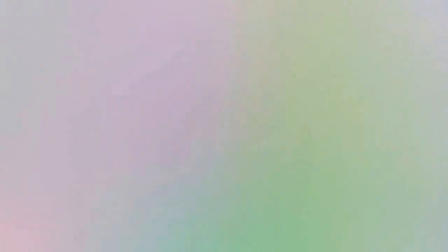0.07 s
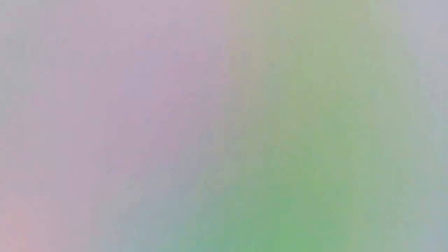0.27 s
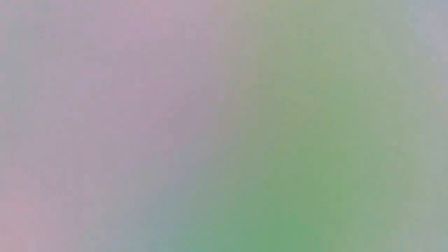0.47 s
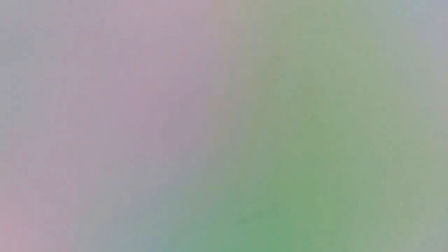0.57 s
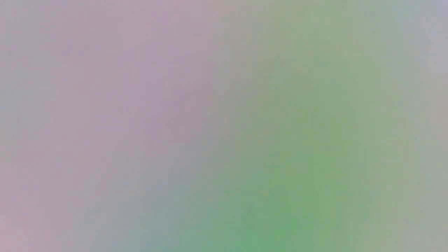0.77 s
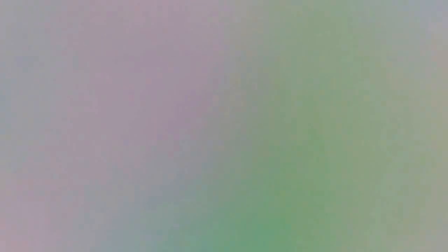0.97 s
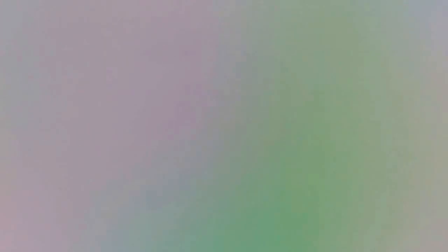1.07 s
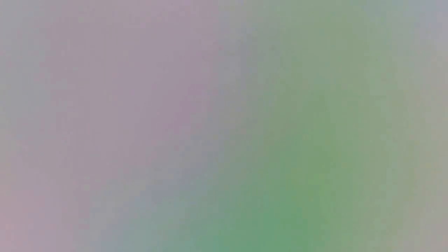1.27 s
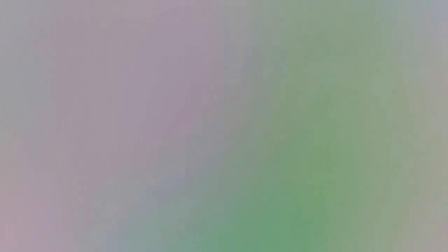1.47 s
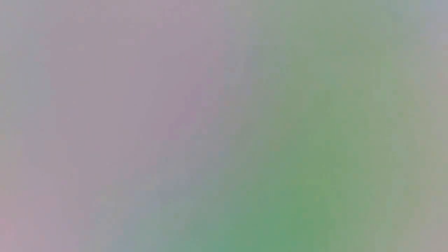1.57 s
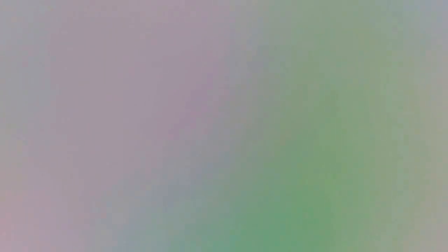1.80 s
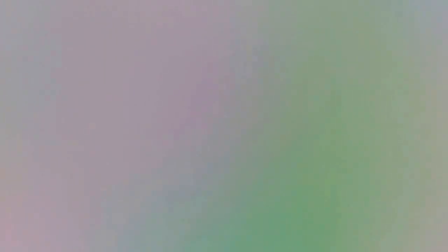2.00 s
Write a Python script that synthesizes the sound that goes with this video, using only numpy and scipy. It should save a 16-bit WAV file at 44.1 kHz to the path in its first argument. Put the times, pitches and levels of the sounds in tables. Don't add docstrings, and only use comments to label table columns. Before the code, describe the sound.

Footsteps crushing snow with hollow pole knocks, a ringing metal tube, tiny squeaks and low thumps

```python
import sys
import numpy as np
from scipy import signal
from scipy.fft import rfft, irfft
from scipy.io import wavfile
from scipy.ndimage import uniform_filter1d

SR = 44100
rng = np.random.default_rng(int(sys.argv[2]) if len(sys.argv) > 2 else 0)


def makeup_ratio(level_db):
    decades = np.asarray(level_db, float) / 20
    return 10 ** decades


def inscribe(sig):
    pcm = np.round(np.clip(np.atleast_2d(sig).T, -1, 1) * 32767)
    wavfile.write(sys.argv[1], SR, pcm.astype(np.int16))


N = 90052


def evened(x):
    return x / np.sqrt(np.mean(x ** 2) + 1e-20)


def curve(points):
    times, levels = np.transpose(points)
    return makeup_ratio(np.interp(np.arange(N) / SR, times, levels))


def colour(x, points):
    f, db = np.transpose(points)
    hz = np.fft.rfftfreq(x.shape[-1], 1 / SR)
    gain = makeup_ratio(np.interp(np.log(hz + 1), np.log(f + 1), db, -90, -90))
    return irfft(rfft(x) * gain, x.shape[-1])


def burst(start, length, db, rise):
    u = (np.arange(N) / SR - start) / length
    swell = np.sin(np.pi / 2 * np.clip(u / rise, 0, 1)) ** 2
    fade_db = -11 * np.clip(u - rise, 0, 9) ** 2
    return makeup_ratio(db + fade_db) * swell


def grains(per_s, spread_db, bed):
    size = makeup_ratio(spread_db * np.minimum(rng.exponential(1, N), 4))
    clicks = size * rng.choice([-1., 1.], N) * (rng.random(N) < per_s / SR)
    return evened(clicks) + bed * rng.standard_normal(N)


def patchy(x, depth_db, gaps=-9.0):
    z = signal.stft(x, nperseg=512)[2]
    field = uniform_filter1d(rng.standard_normal(z.shape), size=25, axis=0)
    field = evened(uniform_filter1d(field, size=7, axis=1))
    patch_db = depth_db * field - 50 * np.clip(gaps - field, 0, .5)
    return signal.istft(z * makeup_ratio(patch_db), nperseg=512)[1][:N]


def rings(rows, rise_cycles):
    out = np.zeros(N)
    for s, db, hz, t60 in rows:
        t = np.maximum(np.arange(N) / SR - s, 0)
        onset = 1 - np.exp(-t * hz / rise_cycles)
        out += makeup_ratio(db - 60 * t / t60) * onset * np.sin(2 * np.pi * hz * t)
    return out


def hiss():
    # f/Hz, level/dB per Hz
    floor_tone = [(100, -55), (170, -16), (447, -21), (539, -17), (1090, -26), (1610, -25.5), (5120, -31),
                  (10800, -20), (14500, -28)]
    # t/s, level/dB
    rustle = [(0, 11), (.65, 9), (.83, 7.5), (.915, 7.5), (.95, 9.5), (1.3, 10.5), (1.55, 10.5),
              (2.04, 11.5)]
    slow = uniform_filter1d(rng.standard_normal(N), size=900)
    flicker = makeup_ratio(evened(uniform_filter1d(slow, size=900)))
    noise = evened(colour(rng.standard_normal((2, N)), floor_tone))
    return makeup_ratio(-79) * curve(rustle) * flicker * noise


def wind():
    # t/s, level/dB
    gust_level = [(0, -46.5), (.12, -56.5), (.33, -71), (.45, -42), (.58, -64), (.78, -64), (.9, -75),
                  (.96, -62), (1.1, -54), (1.5, -52.5), (2.04, -53)]
    # f/Hz, level/dB
    gust_tone = [(25, -20.5), (45, 4.5), (65, 2.5), (120, -6.5), (250, -24), (600, -57.5), (1500, -74)]
    lumps = grains(per_s=290, spread_db=5.0, bed=1.5)
    return curve(gust_level) * evened(colour(lumps, gust_tone))


def crush():
    # start t/s, length/s, dull grain level/dB, fizz level/dB, crispness of dull grains/0-1
    bursts = [(-0.01, 0.029, -55, -45, 0.14), (0.022, 0.051, -52.5, -52.5, 0.04),
              (0.059, 0.16, -73, -59.5, 0.6), (0.118, 0.031, -62.5, -62, 1),
              (0.168, 0.045, -50, -63.5, 0.3), (0.198, 0.071, -51.5, -73, 0.96),
              (0.228, 0.032, -65, -60.5, 1), (0.265, 0.08, -59, -69.5, 0.98),
              (0.296, 0.076, -69, -62.5, 0.7), (0.366, 0.097, -51, -62.5, 0.03),
              (0.402, 0.041, -52, -75, 0.4), (0.484, 0.063, -53.5, -62.5, 0.2),
              (0.568, 0.057, -60, -66.5, 0.61), (0.643, 0.049, -66.5, -67, 0),
              (0.709, 0.043, -73, -65.5, 0.1), (0.76, 0.024, -60.5, -64, 0.2), (0.79, 0.027, -61, -60, 1),
              (0.917, 0.038, -60.5, -58.5, 0.9), (0.931, 0.046, -57, -59, 1),
              (0.979, 0.051, -55.5, -64, 0.65), (1.03, 0.079, -58.5, -68.5, 0.14),
              (1.103, 0.09, -62.5, -64, 0.13), (1.189, 0.15, -62, -69, 0.05),
              (1.294, 0.13, -69, -64.5, 0.47), (1.365, 0.045, -76, -60, 0.9), (1.411, 0.035, -64, -62, 0.2),
              (1.46, 0.19, -77, -70, 1), (1.493, 0.036, -69, -78, 1), (1.588, 0.039, -69, -62.5, 0.9),
              (1.653, 0.083, -68, -69, 0.4), (2.006, 0.086, -61, -70, 0.12)]
    # f/Hz, level/dB per Hz
    dull_tone = [(76, -56), (130, 3.5), (340, 1), (561, -8.5), (726, -8), (1580, -23.5), (4000, -37),
                 (5200, -52), (8800, -120)]
    # f/Hz, level/dB per Hz
    fizz_tone = [(1760, -22.5), (3000, -22.5), (3880, -21), (6300, -12), (7500, -4), (9080, -4.5),
                 (13600, -30.5), (14500, -9.5)]
    rise = 0.36
    dull = evened(patchy(colour(grains(per_s=1400, spread_db=2.0, bed=1.0), dull_tone), depth_db=3.5))
    soft = signal.sosfiltfilt(signal.butter(2, 392, fs=SR, output="sos"), dull)
    fizz = evened(patchy(colour(grains(per_s=2500, spread_db=3.0, bed=0.9), fizz_tone), depth_db=2.0))
    wide = evened(colour(grains(per_s=5900, spread_db=6.0, bed=0.26), fizz_tone))

    soft_power, crisp_power, fizz_power = np.zeros(N), np.zeros(N), np.zeros(N)
    for start, length, dull_db, fizz_db, crisp in bursts:
        power = burst(start, length, dull_db, rise) ** 2
        soft_power += power * (1 - crisp)
        crisp_power += power * crisp
        fizz_power += burst(start, length, fizz_db, rise) ** 2
    thud = np.sqrt(soft_power) * evened(soft)
    crunch = np.sqrt(crisp_power) * evened(dull - soft)
    high = np.sqrt(fizz_power)
    return thud + crunch + high * fizz, high * wide * makeup_ratio(-2.5)


def jolts():
    # t/s, peak level/dB, f/Hz, length/s
    thumps = [(-0.009, -40.5, 61.7, 0.1), (0.029, -48, 75.6, 0.038), (0.324, -57, 88.5, 0.16),
              (0.348, -43.5, 55.5, 0.061), (0.373, -44.5, 117.8, 0.092), (0.408, -34, 58, 0.075),
              (0.433, -32.5, 90, 0.018), (0.47, -45.5, 51.3, 0.096), (0.938, -53, 46, 0.055),
              (1.042, -37.5, 58.4, 0.071), (1.074, -47.5, 88, 0.087), (1.097, -40.5, 48.5, 0.031),
              (1.159, -53, 47.8, 0.36), (1.281, -32, 60.5, 0.045), (1.308, -37.5, 113.5, 0.028),
              (1.346, -41.5, 67.4, 0.043), (1.391, -44, 50.9, 0.15), (1.416, -47, 75.6, 0.054),
              (1.437, -41, 60.7, 0.16), (1.454, -40.5, 98, 0.016), (1.487, -48, 78.1, 0.15),
              (1.532, -35, 92.7, 0.035), (1.577, -51, 50, 0.13), (1.615, -51, 72, 0.037),
              (1.709, -44, 118.2, 0.14), (1.728, -38.5, 81.4, 0.075), (1.768, -51, 60.3, 0.2),
              (1.813, -45.5, 97.6, 0.095), (1.928, -43, 58, 0.079), (1.959, -42.5, 91.5, 0.053),
              (2.018, -47, 119, 0.028)]
    out = np.zeros(N)
    for s, db, hz, length in thumps:
        t = np.clip(np.arange(N) / SR - s, 0, length)
        arch = np.sin(np.pi * (t / length) ** 0.6)
        out += makeup_ratio(db) * arch * np.sin(2 * np.pi * hz * t)
    return out


def grip_knocks():
    # t/s, level/dB, f/Hz, t60/s
    knocks = [
        (0.004, -40, 490, 0.026),
        (0.18, -33, 303, 0.029),
        (0.197, -36.5, 415, 0.085),
        (0.201, -38, 938, 0.1),
        (0.222, -38, 437, 0.082),
        (0.426, -41.5, 276, 0.096),
    ]
    return rings(knocks, rise_cycles=1.0)


def pole():
    # f/Hz, level/dB, t60/s
    modes = [(389.6, -10, 0.11), (592, -19, 0.092), (906, -7.5, 0.094), (1250, -10.5, 0.073),
             (1633, -12, 0.1), (2062, -14.5, 0.086), (2603, -17.5, 0.068), (3566, -26.5, 0.04)]
    # start t/s, length/s, level/dB, tilt/dB per octave
    scrapes = [
        (0.168, 0.071, -49.5, -2.5),
        (0.227, 0.026, -43.5, -1.5),
        (0.267, 0.14, -53, -4),
        (0.306, 0.03, -57.5, 8),
        (0.4, 0.025, -59.5, 5.5),
        (1.358, 0.11, -65.5, 3),
        (1.427, 0.024, -69.5, 11.5),
        (1.598, 0.019, -66.5, 12.5),
    ]
    slips = grains(per_s=2800, spread_db=0.0, bed=0.89)
    out = np.zeros(N)
    for hz, mode_db, t60 in modes:
        r = makeup_ratio(-60 / t60 / SR)
        ring = evened(signal.lfilter([1], [1, -2 * r * np.cos(2 * np.pi * hz / SR), r * r], slips))
        swing = uniform_filter1d(ring ** 2 + 1e-3, size=600)
        ring = evened(ring / swing ** 0.15)
        push = np.zeros(N)
        for start, length, db, tilt in scrapes:
            tilt_db = tilt * np.log2(min(hz, 2600) / 891)
            push += burst(start, length, db + mode_db + tilt_db, 0.17) ** 2
        out += ring * np.sqrt(signal.lfilter([1 - r * r], [1, -r * r], push))
    return out * makeup_ratio(-0.5)


def pings():
    # t/s, level/dB, f/Hz, t60/s
    kicks = [(0.176, -54, 1250, 0.12), (0.178, -58.5, 2100, 0.22), (0.230, -56, 2580, .06),
             (0.241, -45.5, 890, 0.18), (0.242, -63, 2720, .05), (0.289, -61, 2565, 0.052),
             (0.310, -50, 1635, .14), (0.326, -55, 1240, 0.13), (0.403, -51, 2574, 0.035),
             (0.594, -64.5, 2100, 0.051), (1.364, -61, 940, 0.17), (1.390, -53, 905, 0.14),
             (1.431, -57, 2613, 0.1), (1.434, -61, 1652, 0.11), (1.515, -72, 2570, 0.17),
             (1.660, -51.5, 893, 0.26), (1.708, -64, 2604, 0.066)]
    return rings(kicks, rise_cycles=3.5)


def squeaks():
    # t/s, level/dB, f/Hz, t60/s
    chirps = [(0.2339, -47, 8300, .015), (0.3087, -51, 7200, 0.018), (0.9333, -60, 8180, .02),
              (1.429, -54.5, 7450, .05), (1.6072, -50, 6280, .02), (0.2503, -41, 6980, 0.013),
              (0.2514, -46, 8340, 0.025), (1.608, -61, 4630, 0.011), (1.706, -55.5, 6530, 0.023),
              (1.71, -52.5, 8650, .03), (1.81, -54.5, 7740, 0.04)]
    # f/Hz, level/dB, t60/s
    dry_tick = [(1910, -48, 0.023), (2340, -46, 0.027), (6450, -49, 0.014), (8620, -38, 0.025)]
    tick_s = 1.104
    tick = [(tick_s, db, hz, t60) for hz, db, t60 in dry_tick]
    return rings(tick + chirps, rise_cycles=9)


def clods():
    # t/s, level/dB, f/Hz, t60/s
    breaks = [(0.431, -47, 820, 0.05), (0.440, -47, 740, 0.057), (0.499, -46, 533, 0.035),
              (0.508, -45.5, 822, 0.045), (0.514, -46.5, 1070, 0.018), (0.519, -46, 507, .03),
              (0.526, -40, 690, 0.021), (0.552, -55, 330, 0.028), (0.591, -49, 442, 0.021),
              (0.598, -48, 590, 0.049), (0.609, -50, 370, 0.058), (0.769, -55, 295, 0.058),
              (0.799, -52.5, 570, 0.058), (0.924, -56, 806, 0.024), (0.934, -44.5, 765, 0.027),
              (0.943, -53, 1030, 0.027), (0.955, -47.5, 1000, 0.024), (0.955, -41, 298, 0.032),
              (0.957, -58.5, 2080, 0.028), (0.987, -41.5, 360, 0.028), (0.989, -53, 830, 0.026),
              (0.998, -54, 716, 0.055), (1.009, -57, 1050, 0.025), (1.085, -59, 920, 0.045),
              (1.128, -63.5, 960, 0.1), (1.155, -46, 338, 0.035), (1.498, -56.5, 683, 0.057)]
    return rings(breaks, rise_cycles=0.76)


def slide():
    # start t/s, length/s, level/dB
    tip_slide = (1.347, 0.093, -75)
    hz, wide_hz = 5560, 490
    band = [(hz - 2 * wide_hz, -30), (hz, 0), (hz + 2 * wide_hz, -30)]
    return burst(*tip_slide, 0.3) * evened(colour(rng.standard_normal(N), band))


def struck_pole():
    # f/Hz, level/dB, t60/s
    free_modes = [(378.5, -49.5, 0.38), (612, -54.5, 0.55), (893, -38, 0.18), (1256, -53.5, 0.068)]
    strike_s = 1.596
    return rings([(strike_s, db, hz, t60) for hz, db, t60 in free_modes], rise_cycles=16.5)


def scene():
    # f/Hz, level/dB
    port_tone = [(3000, -40), (4500, -13), (7000, -3), (10000, -3.5), (14000, -0.5)]
    floor = hiss()
    snow, snow_side = crush()
    mid = floor[0] + wind() + snow + jolts() + squeaks() + clods()
    mid = mid + grip_knocks() + pole() + pings() + slide() + struck_pole()
    side = patchy(colour(floor[1] + snow_side, port_tone), depth_db=1.5, gaps=-.35)
    return np.array([mid + side, mid - side])


def band_limit(x):
    return signal.sosfilt(signal.butter(12, 14660, fs=SR, output="sos"), x)


def record(dry):
    # f/Hz, level/dB
    mic_band = [(15, -30), (30, -8), (45, 0), (14250, 0), (14340, -70)]
    return band_limit(colour(dry, mic_band))


dry = scene()
out = record(dry)
inscribe(out)
```